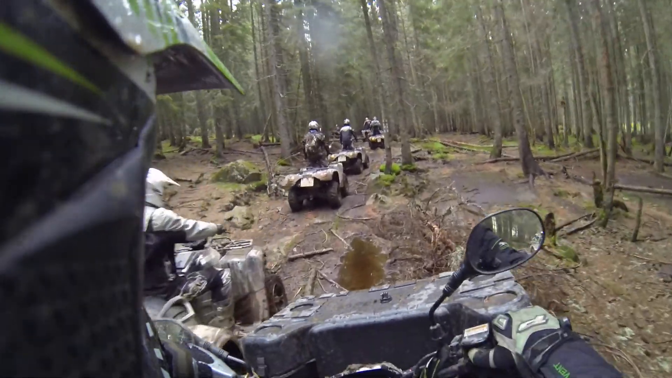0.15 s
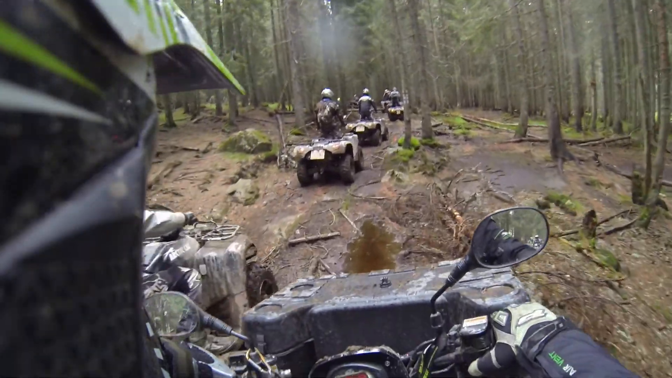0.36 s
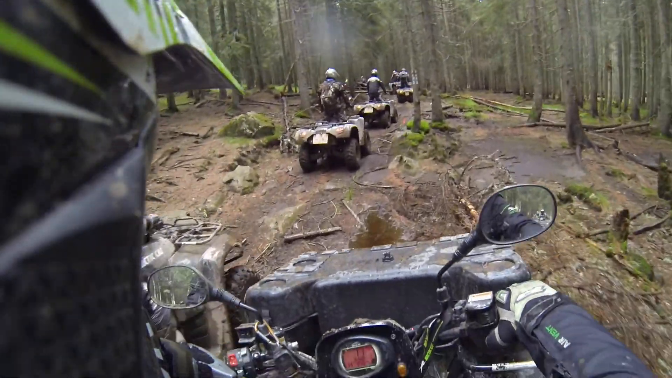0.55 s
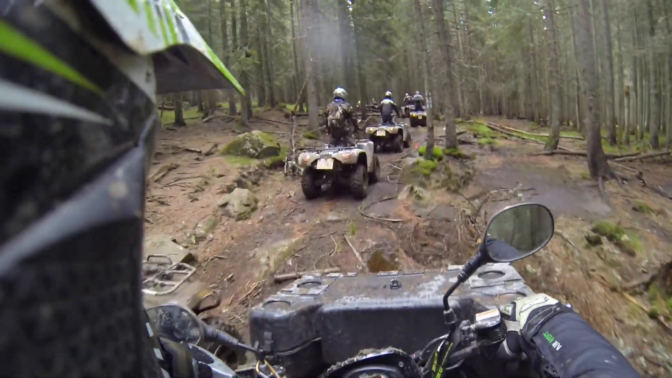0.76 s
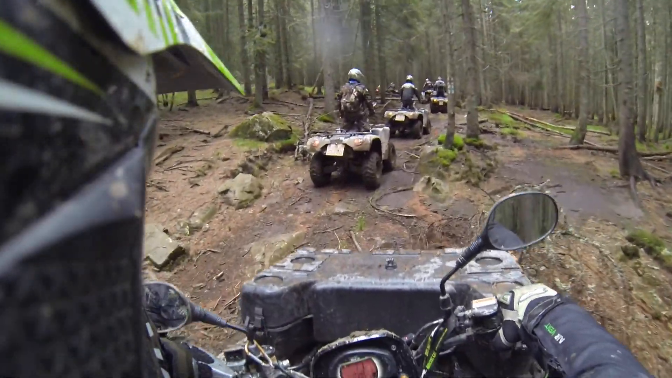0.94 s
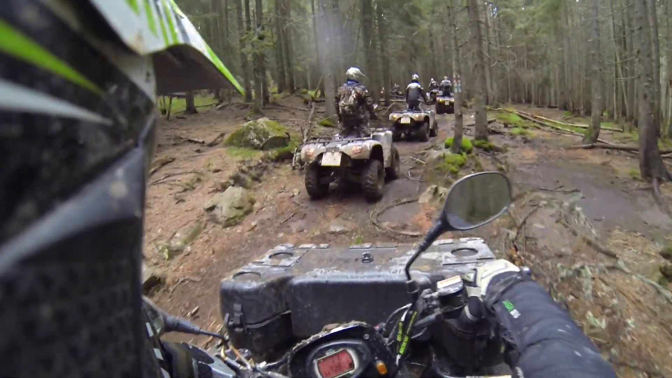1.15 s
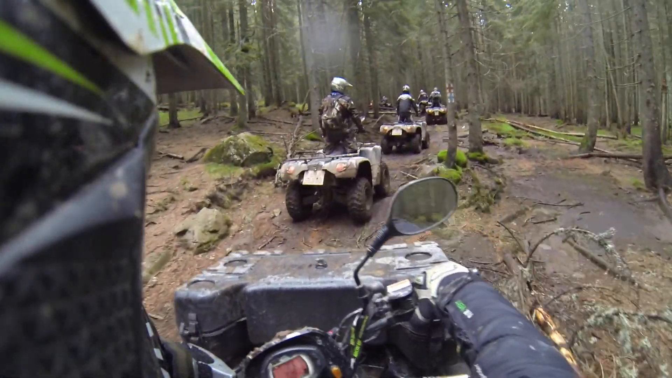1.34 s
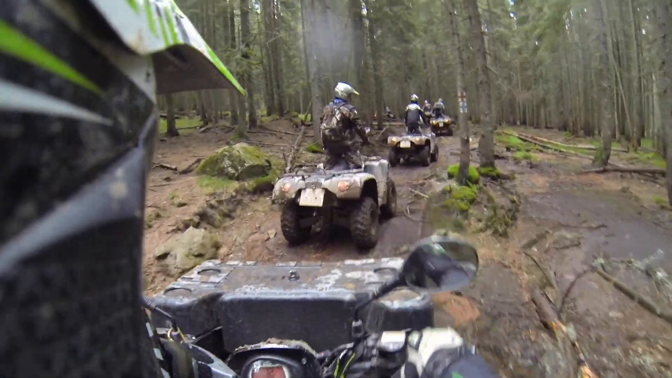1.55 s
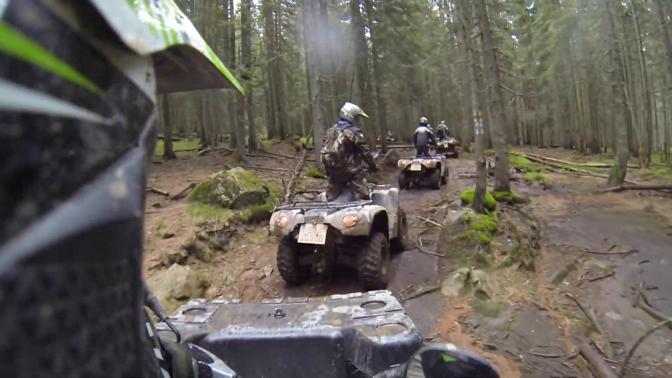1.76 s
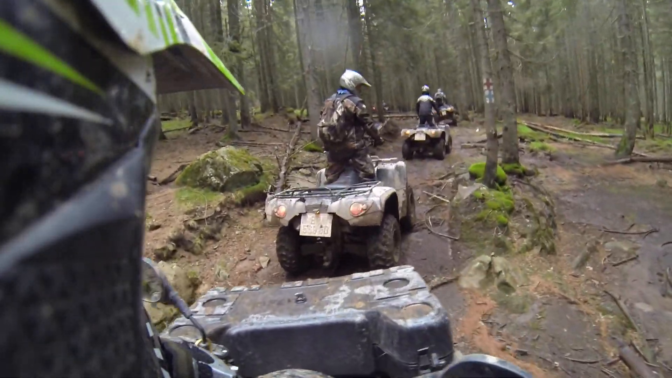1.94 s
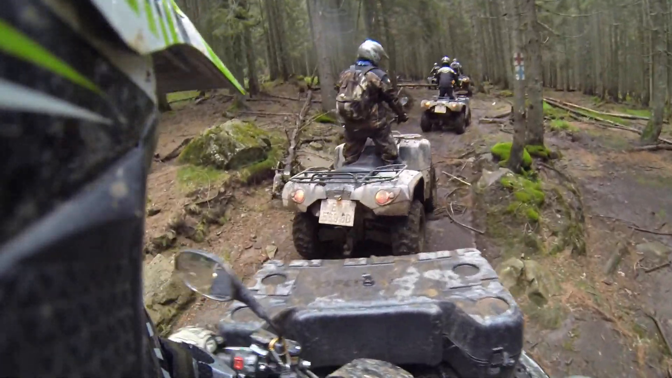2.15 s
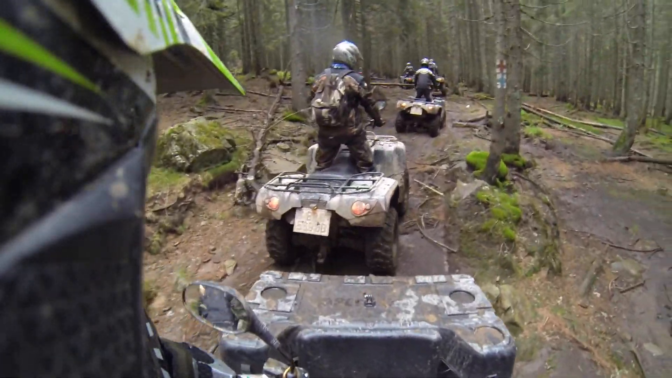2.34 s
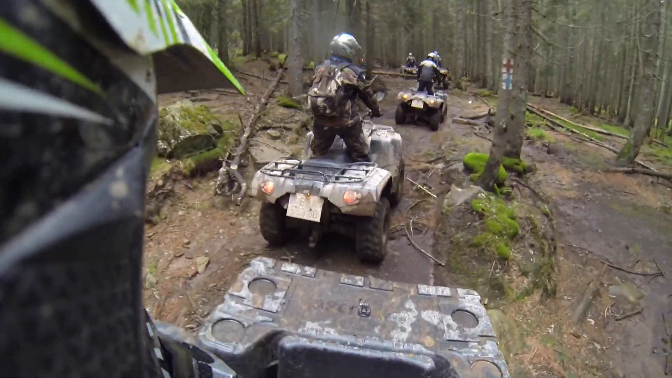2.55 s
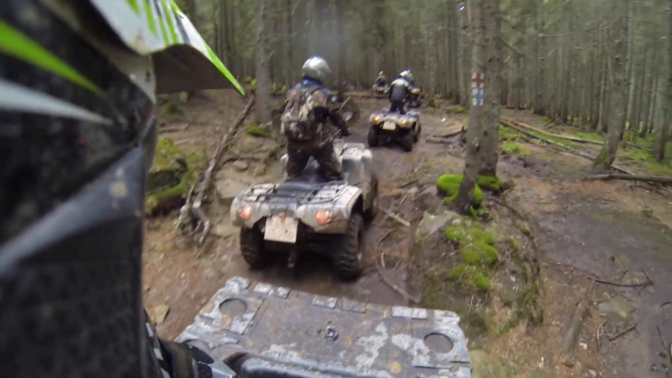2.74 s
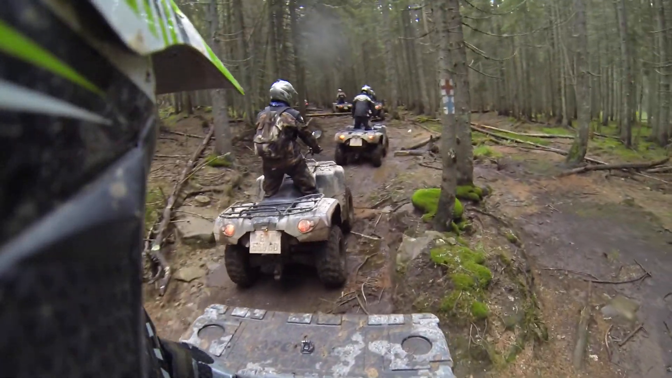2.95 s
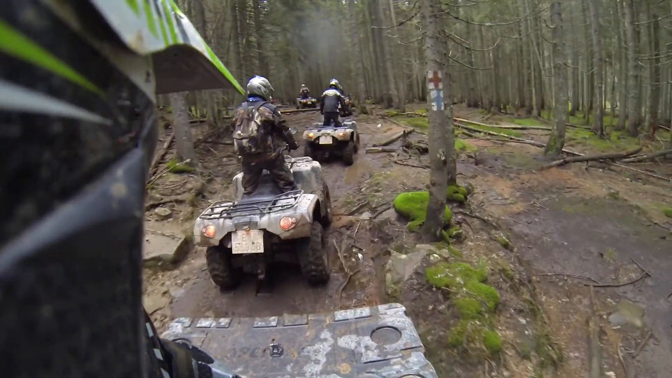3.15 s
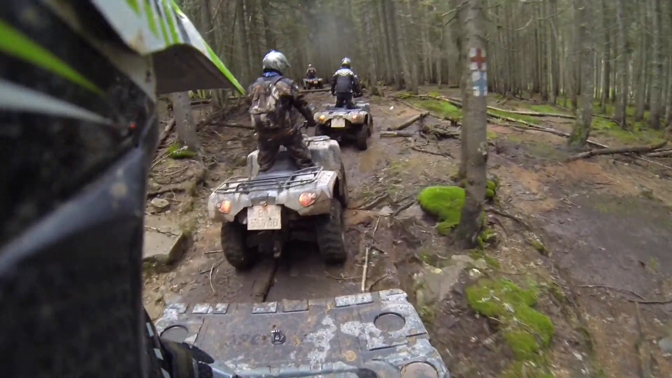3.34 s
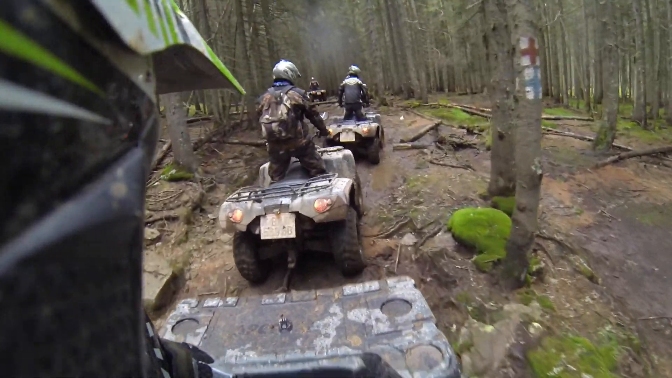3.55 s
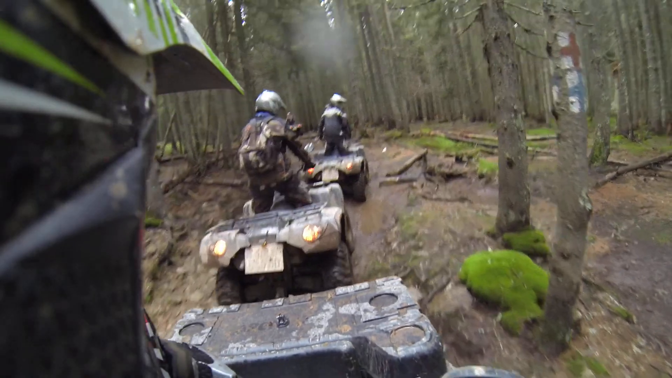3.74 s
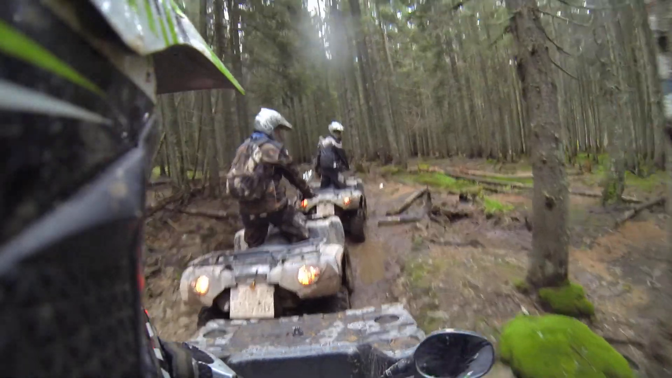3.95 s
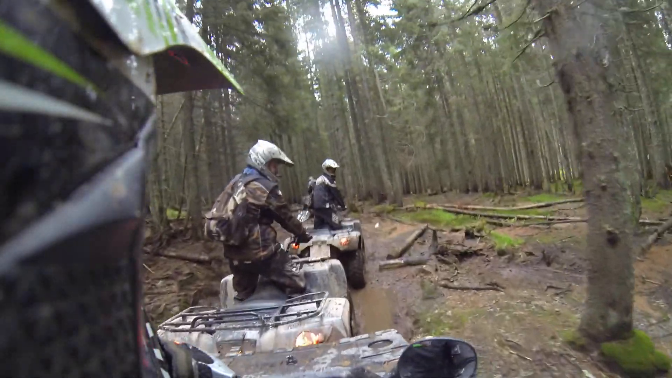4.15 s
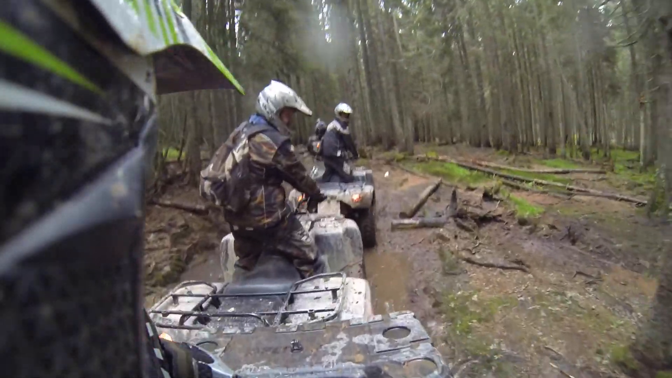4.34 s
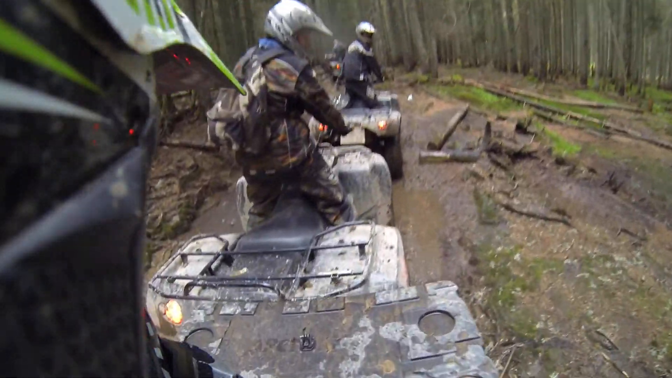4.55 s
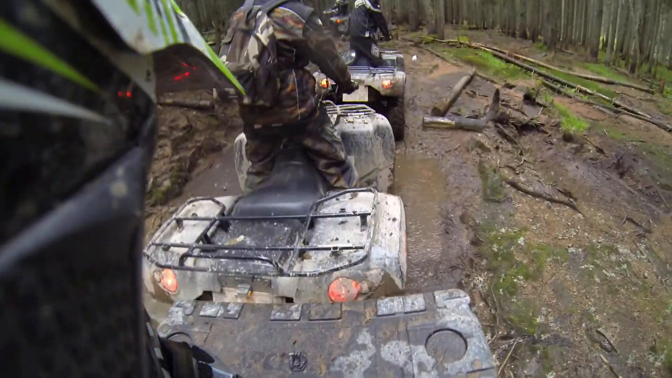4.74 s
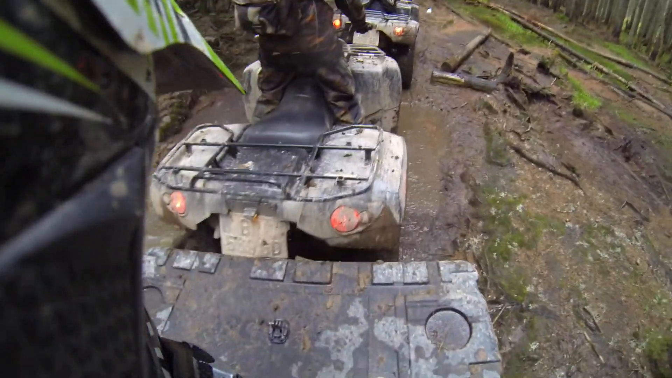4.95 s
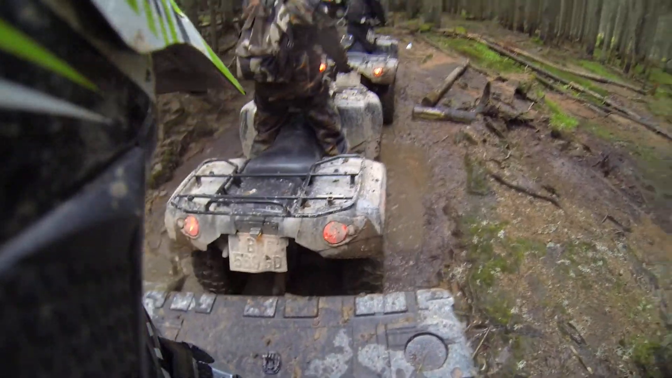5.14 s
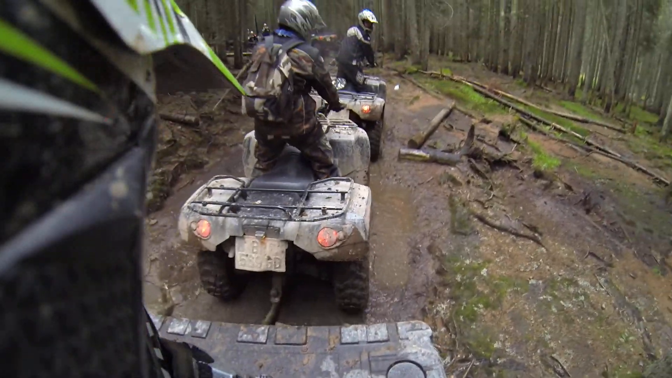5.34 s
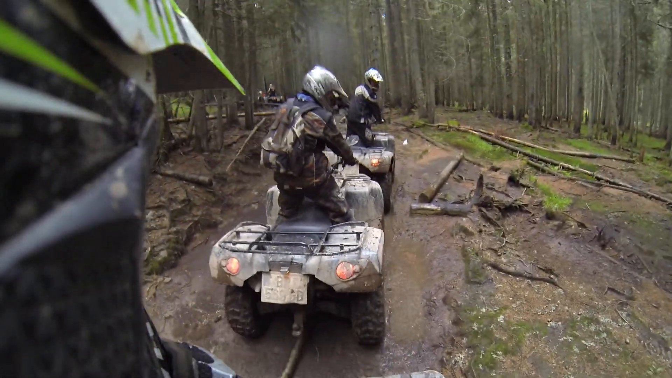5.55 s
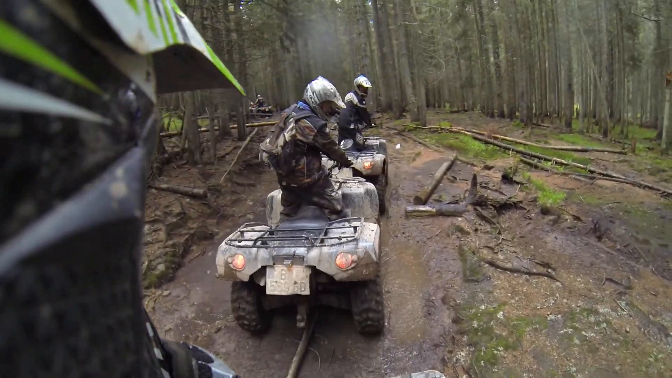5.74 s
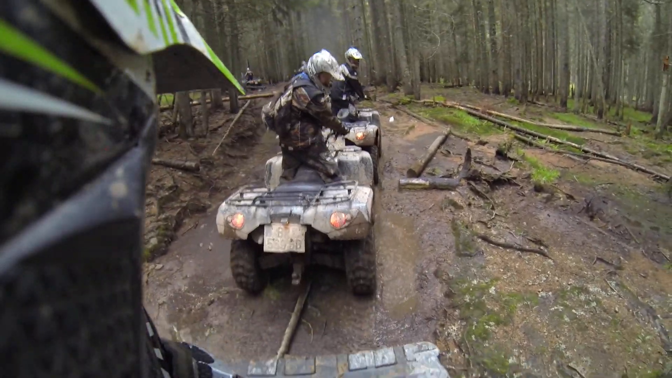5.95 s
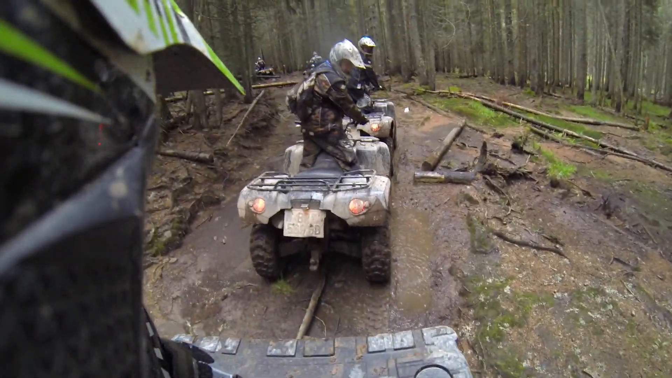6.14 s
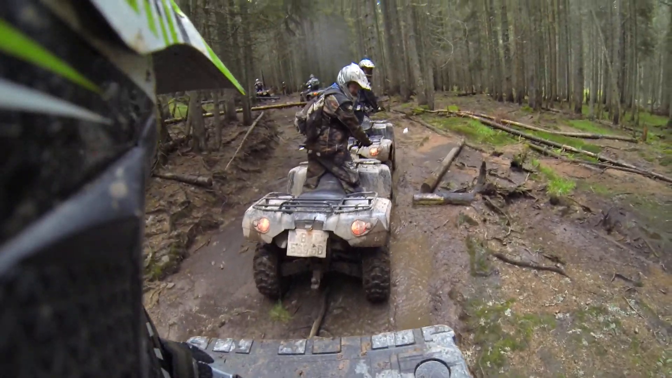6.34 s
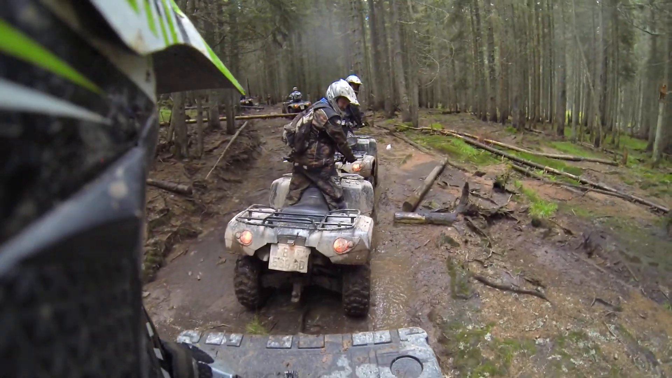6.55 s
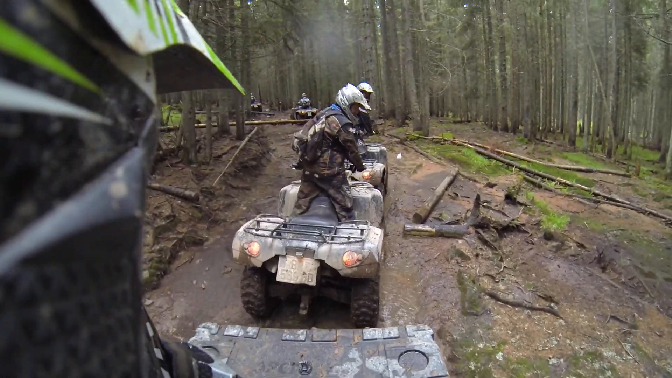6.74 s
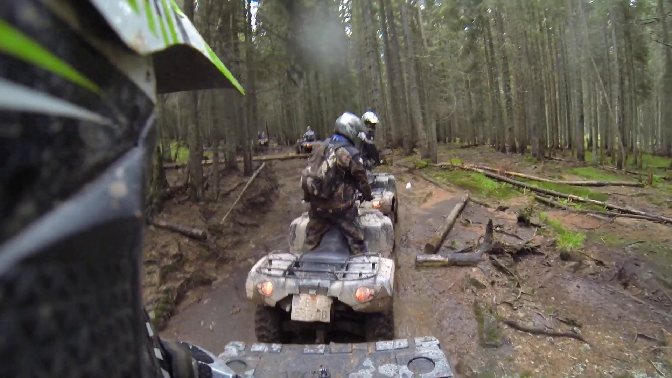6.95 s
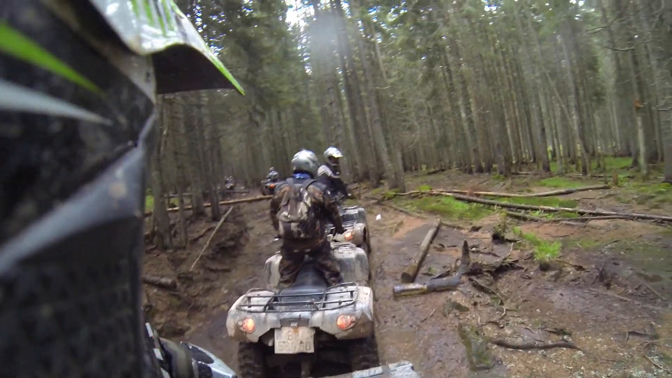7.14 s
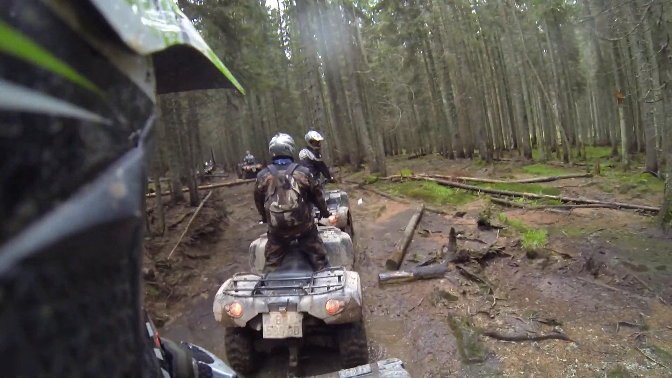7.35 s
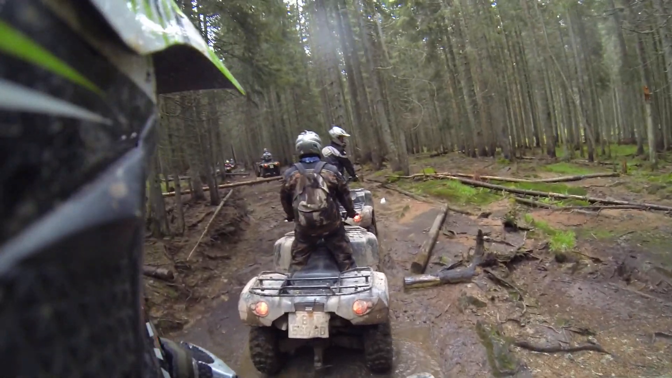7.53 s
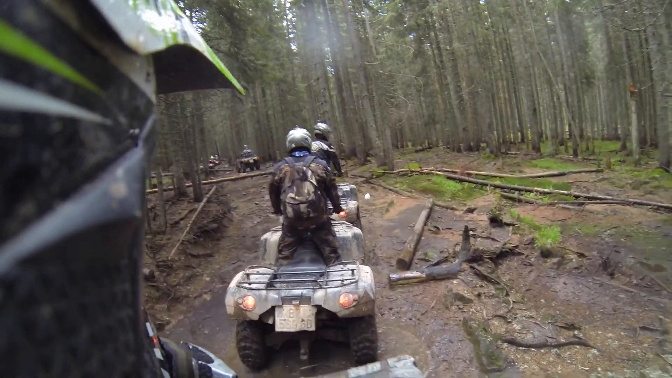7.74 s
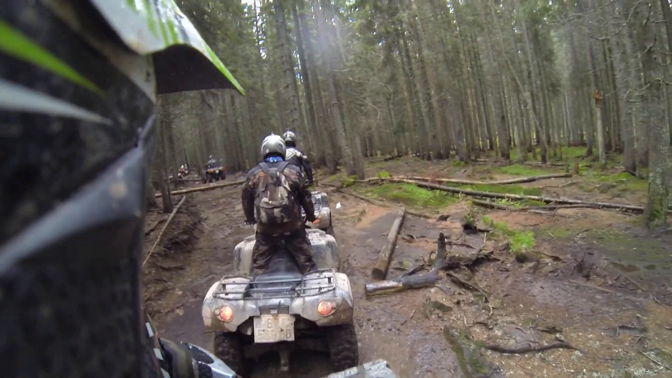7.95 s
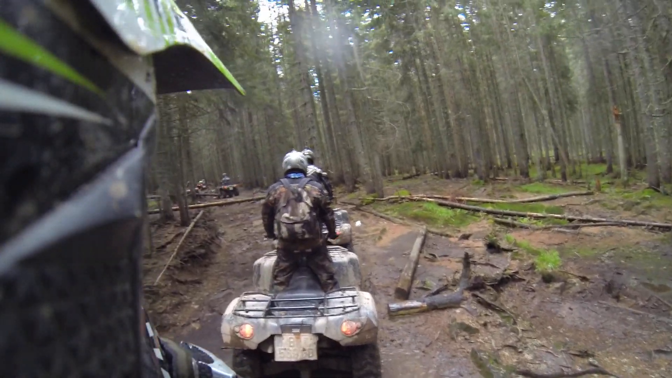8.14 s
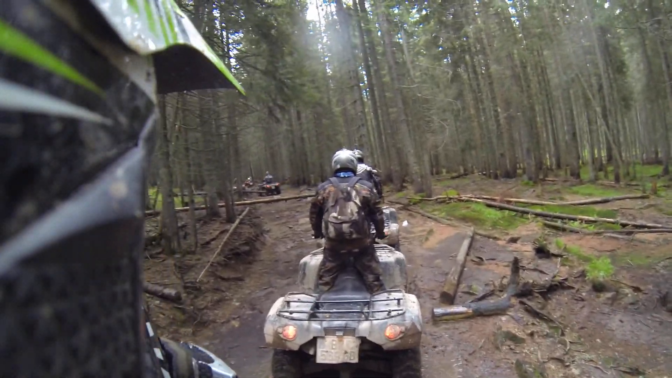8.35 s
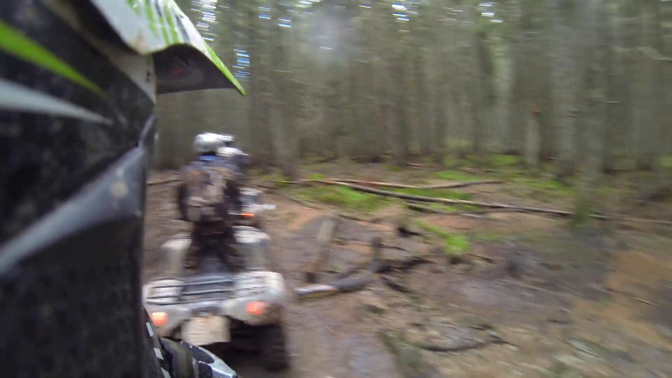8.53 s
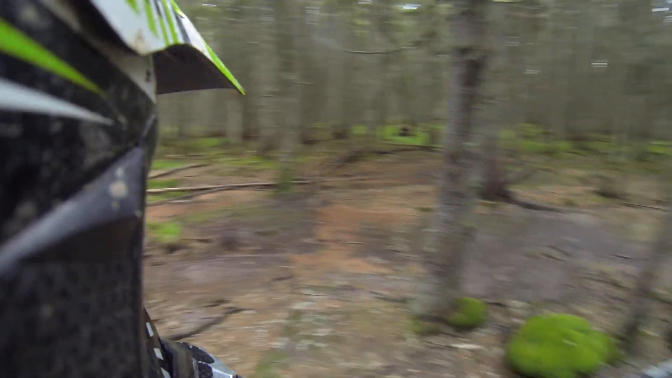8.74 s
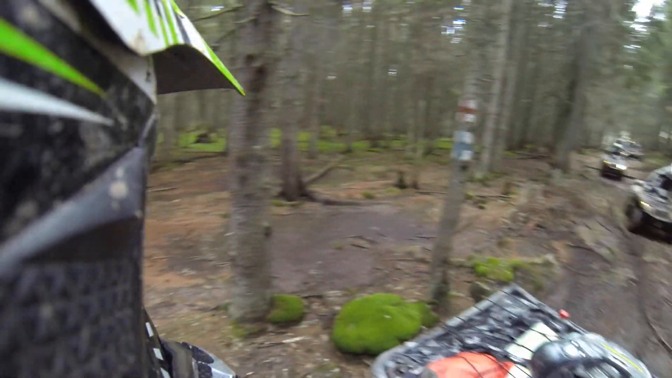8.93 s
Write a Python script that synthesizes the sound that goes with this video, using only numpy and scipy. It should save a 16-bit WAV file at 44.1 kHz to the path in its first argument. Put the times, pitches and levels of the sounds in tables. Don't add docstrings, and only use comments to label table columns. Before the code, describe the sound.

Throughout, a single-cylinder quad bike is heard close and boxy, as from a helmet microphone sealed in plastic, with nasal midrange rattle and faint fan hum, thin electronic whine and hiss underneath. From 0 to 2 s it putters at low revs, slightly quickening, with soft puffs, a knock at 1.1 and a thud near 1.55. Quick paced firings at 2 lead into a climb from 2.3, loudest and highest around 3 to 3.6, clattering and roaring, with a short gear whine near 3.4 to 3.8. The throttle shuts and revs drop to a slow crawl by 4.5, with thuds at 4.9. At 5.34 a branch raps the housing, very loud, dry and chattering. Separate putts quicken from 5.6 into a smaller pull at 6.1 with faint belt whine, easing by 7.2. A brief blip comes at 7.6, then slow idling; heavy low thuds and a breathy air whoosh at 8.7 to 8.9 close it.

```python
import sys
import numpy as np
from scipy import signal
from scipy.fft import rfft, irfft, next_fast_len
from scipy.io import wavfile
from scipy.ndimage import uniform_filter1d

SR = 44100
rng = np.random.default_rng(int(sys.argv[2]) if len(sys.argv) > 2 else 0)


def rack_gain(trim_db):
    fader = np.asarray(trim_db, float)
    return 10 ** (fader / 20)


def store_pcm(level_fs):
    pcm = np.round(np.clip(level_fs, -1, 1) * 32767).astype(np.int16)
    wavfile.write(sys.argv[1], SR, np.atleast_2d(pcm).T)


N = 400869
T = np.arange(N) / SR

# (time [s], firing rate [Hz], load [0-1], pull [0-1], how hard each firing jolts the helmet)
SPEED = [(0, 21, .8, .15), (.4, 21.2, .65, .15), (.95, 24.8, .8, .2), (1.5, 25.4, .8, .1),
         (1.85, 22.5, .5, .2), (2.33, 26, .75, .5), (2.75, 41.4, .85, .6), (3.69, 46.9, .8, .3),
         (4.1, 23.5, .65, .1), (4.5, 14, .2, .15), (5.4, 12.2, .4, .3), (5.65, 16.8, .75, .85),
         (6.06, 25.2, .92, .95), (6.3, 20.8, .88, .9), (6.82, 19.4, .88, .8), (7.2, 14.2, .4, .4),
         (7.66, 24.6, .9, .9), (8.0, 14.5, .55, .5), (9.09, 12.3, .2, .2)]
TOP_S, TOP_HZ, BEND_HZ_PER_S2, SHUT_S = 3.31, 52.3, 37, 3.69
# (time [s], clatter level [dB])
EFFORT = [(0, -34.5), (.5, -37), (1.5, -32), (1.68, -36.5), (2.05, -39.5), (2.3, -31.5), (3.0, -21.5),
          (3.6, -18.5), (3.8, -26), (4.55, -41.5), (5.55, -43.5), (6.05, -34.5), (6.35, -39.5), (7.2, -44),
          (7.4, -40), (7.56, -35.5), (7.7, -40), (7.9, -44), (8.15, -40.5), (9.0, -45.5)]
EFFORT_MID_DB = -35
# (time [s], intake opening [dB], exhaust pressure [dB])
INTAKE = [(0, -8.5, -36.5), (.95, -4, -33.5), (1.4, -6, -31.5), (1.9, -6, -39), (2.22, 5.5, -37),
          (2.58, 2.5, -30.5), (2.72, 4.5, -32), (3.0, 8.5, -34), (3.32, 5, -28.5), (3.6, 7, -28),
          (3.74, 4.5, -33.5), (4.4, -1, -41), (5.4, -4, -40), (5.9, -5.5, -33.5), (6.75, -5, -32.5),
          (7.0, -4.5, -40), (7.55, -4, -32), (7.9, -4.5, -39.5)]
TREBLE_DB, TREBLE_PER_EFFORT, TREBLE_PER_INTAKE = -49, 0.79, 0.38
GROUND_DB = -35
# (time [s], extra level [dB], half length [s])
PATCHES = [(0.093, 4, 0.15), (0.386, 5, 0.12), (1.57, 13, 0.06), (1.956, 5, 0.17), (2.428, 8.5, 0.3),
           (2.798, 9, 0.12), (3.097, 10.5, 0.19), (3.558, 7, 0.28), (3.88, 12.5, 0.11), (4.144, 20, 0.15),
           (4.504, 13.5, 0.24), (4.895, 10, 0.11), (5.36, 7, 0.13), (5.85, 2, 0.14), (6.08, 10.5, 0.25),
           (6.719, 6.5, 0.76), (7.65, 11, 0.24), (7.933, 7.5, 0.048), (8.32, 9, 0.066), (8.527, 5.5, 0.034),
           (8.8, 10, 0.21), (9.018, 9, 0.1)]
ORDER_LEVELS = [2, -5, 3, -2, -5, -5, 0, -1, -3, -1, -2, -2, 0, 0, -2, -4, -4, -3, -4, -4]
# (frequency [Hz], level [dB])
PIPE_RESPONSE = [(45, -34), (82, -1.5), (103, 1), (125, -5.5), (150, -14), (208, -2.5), (255, -6),
                 (310, -8), (350, -6.5), (420, -9), (480, -9), (575, -10.5), (650, -24), (705, -11.5),
                 (780, -15), (880, 2), (960, -15.5)]
# (frequency [Hz], density [dB per Hz])
RUMBLE_SPECTRUM = [(35, -37), (60, 6), (70, 7), (102, 2), (177, -10), (452, -18.5), (636, -24),
                   (884, -18.5), (1010, -26.5), (1100, -25.5), (1430, -44), (2420, -120)]
# (frequency [Hz], density [dB per Hz])
HEAVE_SPECTRUM = [(3.5, -41.5), (6.0, 3), (30, -3), (52, -5), (75, -65), (90, -9.5), (120, -43),
                  (200, -120)]
# (frequency [Hz], density [dB per Hz])
CLATTER_SPECTRUM = [(350, -19), (600, -13), (659, -14), (863, -8.5), (948, -12), (1040, -15.5), (1350, 1.5),
                    (1560, -2), (2100, -18), (2470, -18.5), (4400, -29), (5110, -31.5), (6780, -42),
                    (9800, -54.5), (13500, -54.5), (15000, -77)]
# (frequency [Hz], width [Hz], boost [dB])
HOUSING_MODES = [(870, 33, 4.5), (1154, 38, 9), (1394, 155, 3), (1574, 96, 4.5), (1741, 46, 5.5),
                 (2430, 690, 3.5), (3970, 180, 6), (5040, 320, 5), (8140, 1200, 7), (8900, 300, -0.5),
                 (10630, 1060, 7.5), (13200, 900, 0)]
# (frequency at full revs [Hz], level re treble clatter [dB])
PANELS = [(1920, -7.5), (2290, -10), (2480, -11.5), (2700, -11), (3130, -16.5), (3630, -18), (3910, -20),
          (7540, -36)]
PANEL_DRIFT, PANEL_RISE, PANEL_WIDTH, PANEL_PATCHY_DB = .01, .1, .04, 2.5
# (time [s], peak [dB], treble re peak [dB], t60 [s])
PUFFS = [(0.1835, -22, -27, 0.032), (0.817, -20, -40, 0.035), (0.8586, -19.5, -43, 0.036),
         (1.1296, -12.5, -35, 0.058), (1.2024, -44, -14, 0.04), (1.3423, -30, -36, 0.04),
         (1.5594, -22, -28, 0.032), (2.3864, -35, -24, 0.051), (3.046, -7, -30, 0.037),
         (4.4598, -31, -3, 0.051), (4.592, -29, -16, 0.042), (4.6398, -21.5, -35, 0.045),
         (4.7162, -29, -24, 0.028), (4.8382, -22, -21.5, 0.18), (5.1148, -35, -14, 0.043),
         (5.279, -35, -16, 0.045), (5.6004, -18, -27, 0.073), (5.802, -29, -40, .04),
         (6.083, -31, -40, 0.1), (6.103, -26, -40, .05), (6.125, -33, -42, 0.083), (6.164, -42, -40, .05),
         (6.203, -42, -40, 0.045), (7.0638, -49, -23, 0.04), (7.285, -37, -10, 0.067),
         (7.454, -45, -24, 0.031), (7.5455, -30, -28, 0.04), (7.8094, -51, -15, 0.04),
         (8.9979, -25.5, -36, 0.062)]
# (first time [s], first gap [s], gap ratio, firings)
RUNS = [
    (1.9655, .0407, 1.0, 7),
    (6.617, .044, 1.42, 3),
]
# (peak [dB], growth per firing [dB], treble re peak [dB], t60 [s])
RUN_STRENGTH = [(-27, 0.5, -14.5, 0.071), (-28, 0, -17.5, 0.16)]
# (time [s], peak [dB])
PUTTS = [(5.662, -29.5), (5.7213, -25.5), (5.7729, -27), (5.821, -27), (5.868, -24), (5.9158, -25),
         (5.9565, -22.5), (5.999, -23), (6.0424, -24)]
PUTT_LAG_S, PUTT_HZ, PUTT_DB, PUTT_T60_S = 0.02, 290, -3, 0.049
RATTLE_PART, LOCK_S = .42, .4
# (time [s], peak [dB], pitch [Hz], t60 [s])
THUMPS = [(7.285, -34, 430, .05), (7.472, -38, 430, .08), (7.514, -36, 430, .08), (7.545, -36, 430, .08),
          (7.58, -37, 430, .08), (7.602, -35, 430, .08), (7.639, -39, 430, .08)]
# (time [s], peak [dB], pitch [Hz], t60 [s])
TICKS = [(0.0877, -36.5, 4450, 0.027), (1.043, -56, 3970, 0.05), (1.1295, -31, 2300, .02),
         (1.2022, -44, 4520, 0.041), (1.56, -34, 4300, 0.042), (4.46, -38, 3900, 0.066),
         (4.8364, -41.5, 4160, 0.05), (7.811, -51, 4730, 0.05)]
# (frequency re pitch, density [dB per Hz])
GRIT_SPECTRUM = [(0.61, -30), (0.97, 0), (1.18, -2), (1.5, -16), (2.5, -22)]
# (time [s], peak [dB])
RAPS = [
    (5.3399, -.6),
    (5.3413, -5.5),
    (5.3456, -13),
    (5.351, -21),
    (5.3555, -21),
]
# (frequency [Hz], level [dB], t60 [s])
RAP_MODES = [(297, -20.5, 0.12), (447, -14, 0.096), (605, -35, 0.057), (750, -18.5, 0.095),
             (966, -14, 0.039), (1190, -1, 0.035), (1416, 9, 0.02), (1635, 2, 0.0088), (1830, 11, 0.013),
             (2270, -9, 0.014), (2950, 4, 0.0095), (4730, -21, 0.014), (5640, -24, 0.01)]
RAP_PEAK_S = .0028
# (frequency [Hz], density [dB per Hz])
CRACK_SPECTRUM = [(200, -19), (700, -34), (1500, 0.5), (3000, -8), (6000, -26), (9000, -48), (15000, -50)]
KNOCK_DB, KNOCK_SHORTER = -10, 0.39
# (time [s], peak [dB], pitch [Hz], t60 [s])
BUMPS = [(0.442, -20, 160, 0.039), (0.453, -22, 54, 0.09), (0.661, -20.5, 61, 0.17),
         (1.129, -15.5, 310, 0.026), (1.13, -28, 490, 0.054), (1.541, -10.5, 100, 0.068),
         (1.554, -13.5, 217, 0.11), (1.6, -17, 36, 0.07), (2.22, -26, 38, 0.78), (3.995, -14, 11.4, 2.8),
         (4.483, -17, 164, 0.037), (4.494, -25, 56, 0.18), (4.637, -32, 470, 0.027),
         (4.904, -13, 164, 0.042), (4.916, -10, 46, 0.17), (5.351, -16, 132, 0.062),
         (5.6, -25.5, 710, 0.057), (5.601, -31, 840, 0.068), (5.672, -14, 52, 0.079),
         (8.13, -18.5, 46, 0.4), (8.691, -24, 23, 0.12), (8.792, -4, 49, 0.073), (8.799, -14, 163, 0.067),
         (8.829, -9, 85, .1), (8.858, -10, 50, 0.099), (8.869, -20, 127, 0.37), (8.899, -25, 190, 0.076),
         (8.928, -22.5, 156, 0.14), (8.981, -16, 145, 0.046)]
BUMP_ATTACK_TURNS = 0.47
# (time [s], mesh frequency [Hz], level [dB])
MESH = [(3.2, 1545, -40), (3.39, 1550, -21), (3.45, 1575, -22), (3.485, 1620, -17), (3.53, 1540, -17),
        (3.59, 1530, -19), (3.62, 1500, -25), (3.68, 1470, -20), (3.72, 1350, -22), (3.8, 1150, -29),
        (3.86, 1050, -50)]
# (ratio to the final drive, level [dB])
GEAR_PAIRS = [(1, 0), (.885, -8), (1.17, -20)]
# (start [s], end [s], level [dB], rise [dB/s], fall [dB/s])
BELT_SWELL = (5.85, 6.85, -47, 50, 60)
BELT_HZ, BELT_IDLE_DB = 1193, -56.5
# (start [s], end [s], level [dB], rise [dB/s], fall [dB/s])
RUSH_SWELL = (8.71, 8.83, -34.5, 70, 90)
# (time [s], frequency [Hz])
WHISTLE = [
    (8.599, 1346),
    (8.72, 1427),
    (8.8, 1510),
    (8.9, 1440),
]
WHISTLE_DB, WHISTLE_WIDTH_HZ = -5.5, 90
# (frequency [Hz], wander [Hz], level [dB])
FAN = [(238, 12, -58), (553, 9, -65)]
# (frequency [Hz], level [dB])
WHINE = [(10643, -81.5), (10691, -92), (13189, -87.5)]
HISS_DB = -65.5
# (frequency [Hz], density [dB per Hz])
HISS_SPECTRUM = [(100, 11), (6000, -3.0), (12000, -13.5), (14500, -11), (15200, -28)]


def engine(hz, load, pull, db, treble_db, shake_db, exhaust_db, intake_db):
    phase = crank(hz)
    cycle, part = phase.astype(int), phase % 1
    size = uniform_filter1d(rack_gain(0.14 * rng.standard_normal(1000))[cycle], SR // 60)

    angle = 2 * np.pi * phase
    stroke = size * (np.cos(angle) + .75 * np.cos(2 * angle) + .1 * np.cos(3 * angle))
    heave = rack_gain(2.5 * walk(7)) * shape(rng.standard_normal(N), HEAVE_SPECTRUM)
    steady = pull * np.clip(1.6 - hz / 45, 0, 1)
    shake = np.sqrt(steady) * 1.1 * stroke + np.sqrt(1 - steady) * heave

    chug = .4 + 1.2 * pull * np.clip(1 - hz / 50, 0, 1)
    rattle = np.exp(-((part + .58) % 1) / .2) + .5 * np.exp(-part / .1)
    gate = .75 - .25 * pull * (hz < 30) + chug * size * uniform_filter1d(rattle, SR // 400)

    low, high = split(shape(rng.standard_normal(N), RUMBLE_SPECTRUM), 181)
    high_db = intake_db - 1.5 - 0.047 * hz + 2 * walk(11)
    rumble = rack_gain(1.0 * walk(26)) * low + rack_gain(high_db) * gate * high
    exhaust = np.sqrt(load) * .7 * orders(hz, phase, intake_db) + np.sqrt(1 - load) * rumble

    body, treble = split(shape(gate * rng.standard_normal(N), CLATTER_SPECTRUM, HOUSING_MODES))
    clatter = rack_gain(db - 2.0 + 1.14 * walk(17)) * body
    clatter = clatter + rack_gain(treble_db - 0.5 + 0.79 * walk(16)) * treble
    return clatter + panels(hz, treble_db) + rack_gain(shake_db) * shake + rack_gain(exhaust_db - 1.5) * exhaust


def ride():
    hz, load, pull = curves(SPEED)
    db, = curves(EFFORT)
    intake_db, exhaust_db = curves(INTAKE)
    big_rev = TOP_HZ - BEND_HZ_PER_S2 * (T - TOP_S) ** 2
    hz = np.maximum(hz, big_rev * (T < SHUT_S))
    treble_db = TREBLE_DB + TREBLE_PER_EFFORT * (db - EFFORT_MID_DB) + TREBLE_PER_INTAKE * intake_db
    shake_db = GROUND_DB + sum(extra_db * np.exp(-((T - s) / half) ** 2) for s, extra_db, half in PATCHES)
    return hz, load, pull, db, treble_db, shake_db, exhaust_db, intake_db


def crank(hz):
    phase = .3 + np.cumsum(hz * (1 + .003 * walk(20))) / SR
    first, gap, _, count = RUNS[0]
    s = np.r_[first + gap * np.arange(count), np.transpose(PUTTS)[0]]
    error = (RATTLE_PART - phase[(s * SR).astype(int)] + .5) % 1 - .5
    slip = np.unwrap(error, period=1)
    return phase + np.interp(T, np.r_[s[0] - LOCK_S, s], np.r_[0, slip])


def orders(hz, phase, intake_db, count=8):
    hz, phase, intake_db = hz[::count], phase[::count], intake_db[::count]
    pipe_hz, pipe_db = np.transpose(PIPE_RESPONSE)
    pipe = 0
    for order, order_db in enumerate(ORDER_LEVELS, 2):
        pitch = order * hz
        db = order_db + np.interp(np.log(pitch), np.log(pipe_hz), pipe_db)
        db = db + intake_db * np.clip(np.log2(pitch / 110), 0, 1)
        db = db - np.clip((38 - hz) * .3, 0, 6) * np.clip(pitch / 130 - 1, 0, 1)
        db = db + 2.4 * walk(9 * count)[:len(hz)]
        jitter = .006 * order * walk(12 * count)[:len(hz)]
        turns = order * phase + min(order / 14, 1) * rng.random() + jitter
        pipe = pipe + rack_gain(db) * np.cos(2 * np.pi * turns)
    return signal.resample_poly(pipe, count, 1)[:N]


def panels(hz, treble_db):
    out = 0
    for top_hz, db in PANELS:
        pitch = top_hz * (1 + PANEL_RISE * (hz / TOP_HZ - 1) + PANEL_DRIFT * walk(3))
        buzz = narrow_noise(np.cumsum(pitch) / SR, PANEL_WIDTH * top_hz)
        out = out + rack_gain(db + PANEL_PATCHY_DB * walk(7)) * buzz
    return rack_gain(treble_db) * out


def hard_firings():
    rows = list(PUFFS) + [(s, db - 0.5, -38, .06) for s, db in PUTTS]
    for (s, gap, ratio, count), (db, growth_db, treble_db, t60) in zip(RUNS, RUN_STRENGTH):
        for k in range(count):
            rows.append((s, db + k * growth_db, treble_db, t60))
            s += gap * ratio ** k
    return rows


def puffs():
    out, t = np.zeros(N), np.arange(SR // 8) / SR
    body, treble = split(shape(rng.standard_normal(N), CLATTER_SPECTRUM, HOUSING_MODES))
    edge = np.diff(treble, prepend=0)
    treble = treble + .3 * edge / np.std(edge)
    body = body / np.sqrt(uniform_filter1d(body ** 2, SR // 150) + .1)
    for s, db, treble_db, t60 in hard_firings():
        i = min(int(s * SR), N - len(t))
        gust = body[i:i + len(t)] + rack_gain(treble_db + 5.5) * treble[i:i + len(t)]
        knock = 0
        for hz, mode_db, ring in RAP_MODES[3:10]:
            pitch = hz * (1 + 0.034 * rng.standard_normal())
            knock = knock + rack_gain(mode_db / 2) * fade(t, KNOCK_SHORTER * ring) * np.sin(2 * np.pi * pitch * t)
        gust = fade(np.maximum(t - .006, 0), t60) * gust + rack_gain(KNOCK_DB) * knock
        add(out, s, rack_gain(db - 10.5) * np.minimum(t / 0.0008, 1) * gust)
    return out


def ticks():
    out, t = np.zeros(N), np.arange(SR // 8) / SR
    rows = list(TICKS) + [(s, db + 2, hz * 1.04, t60) for s, db, hz, t60 in THUMPS]
    rows += [(s + PUTT_LAG_S, db + PUTT_DB, PUTT_HZ, PUTT_T60_S) for s, db in PUTTS]
    for s, db, hz, t60 in rows:
        grit = shape(rng.standard_normal(len(t)), [(ratio * hz, level) for ratio, level in GRIT_SPECTRUM])
        envelope = np.minimum(t / 0.00093, 1) * fade(np.maximum(t - .004, 0), t60)
        add(out, s, rack_gain(db - 9.0) * envelope * grit)
    return out


def raps():
    out, t = np.zeros(N), np.arange(SR // 5) / SR
    ring = sum(rack_gain(db) * fade(t, t60) * np.cos(2 * np.pi * hz * (t - RAP_PEAK_S)) for hz, db, t60 in RAP_MODES)
    ring = ring * (1 - np.exp(-(t / 0.0022) ** 3))
    ring = ring / np.max(np.abs(ring))
    for s, db in RAPS:
        crack = shape(rng.standard_normal(len(t)), CRACK_SPECTRUM)
        crack = np.minimum(t / 0.00046, 1) * fade(t, 0.02) * crack
        add(out, s, rack_gain(db) * (ring + rack_gain(-22.5) * crack))
    return out


def bumps():
    out, t = np.zeros(N), np.arange(SR // 3) / SR
    for s, db, hz, t60 in BUMPS:
        turns = hz * (t + 0.0021 * (1 - np.exp(-t / 0.077)))
        attack = np.sin(np.pi / 2 * np.minimum(t * max(hz, 100) / BUMP_ATTACK_TURNS, 1)) ** 2
        envelope = attack * fade(t, t60) * np.cos(np.pi / 2 * t / t[-1])
        add(out, s, rack_gain(db - 2.5) * envelope * np.sin(2 * np.pi * turns))
    return out


def drive():
    s, hz, db = np.transpose(MESH)
    turns = np.cumsum(np.interp(T, s, hz) * (1 + .004 * walk(40))) / SR
    gears = sum(rack_gain(g + 1.5 * walk(25)) * np.sin(2 * np.pi * ratio * turns) for ratio, g in GEAR_PAIRS)
    return rack_gain(np.interp(T, s, db, left=-120, right=-120) + 2) * gears


def belt():
    turns = np.cumsum(BELT_HZ + 20 * walk(25)) / SR
    return rack_gain(np.maximum(swell(*BELT_SWELL), BELT_IDLE_DB) + 3 * walk(30)) * np.sin(2 * np.pi * turns)


def rush():
    body = split(shape(rng.standard_normal(N), CLATTER_SPECTRUM, HOUSING_MODES), 3600)[0]
    whistle = narrow_noise(np.cumsum(curves(WHISTLE)[0]) / SR, WHISTLE_WIDTH_HZ)
    return rack_gain(swell(*RUSH_SWELL) - 1.0 + 1.0 * walk(12)) * (body + rack_gain(WHISTLE_DB) * whistle)


def tones():
    out = np.zeros(N)
    for hz, wander, db in FAN:
        turns = np.cumsum(hz + wander * walk(2.5)) / SR
        out += rack_gain(db + 4.0 * walk(6)) * np.sin(2 * np.pi * turns)
    for hz, db in WHINE:
        out += rack_gain(db + 3 + .8 * walk(9)) * np.sin(2 * np.pi * (hz * T + .2 * walk(25)))
    return out


def shape(x, points, boosts=()):
    size = next_fast_len(len(x))
    f = np.maximum(np.arange(size // 2 + 1) * SR / size, 1)
    hz, db = np.transpose(points)
    db = np.interp(np.log(f), np.log(hz), db, left=-120, right=-120)
    db = db + sum(boost_db / (1 + (2 * (f - c) / w) ** 2) for c, w, boost_db in boosts)
    y = irfft(rfft(x, size) * rack_gain(db), size)[:len(x)]
    return y / np.std(y)


def split(x, hz=2150):
    low = signal.sosfiltfilt(signal.butter(4, hz, fs=SR, output="sos"), x)
    return low / np.std(low), (x - low) / np.std(x - low)


def walk(rate):
    k = int(SR / rate)
    held = np.repeat(rng.standard_normal(N // k + 1), k)
    return 1.3 * uniform_filter1d(uniform_filter1d(held, k), k)[:N]


def narrow_noise(turns, width):
    return walk(width) * np.sin(2 * np.pi * turns) + walk(width) * np.cos(2 * np.pi * turns)


def curves(table):
    s, *columns = np.transpose(table)
    return [np.interp(T, s, column) for column in columns]


def swell(start, end, db, rise, fall):
    return db - rise * np.maximum(start - T, 0) - fall * np.maximum(T - end, 0)


def fade(t, t60):
    return np.exp(-np.log(1000) * t / max(t60, .004))


def add(out, s, sound):
    i = int(s * SR)
    out[i:i + len(sound)] += sound[:N - i]


def scene():
    knocks = puffs() + ticks() + raps() + bumps()
    return (engine(*ride()) + knocks + drive() + belt() + rush() + tones())[None]


def low_pass(x):
    return signal.sosfilt(signal.butter(12, 15170, fs=SR, output="sos"), x)


def record(dry):
    hiss = rack_gain(HISS_DB) * shape(rng.standard_normal(N), HISS_SPECTRUM)
    heard = signal.sosfilt(signal.butter(6, 15200, fs=SR, output="sos"), dry + hiss)
    return low_pass(np.clip(heard, -1, 1))


dry = scene()
out = record(dry)
store_pcm(out)
```